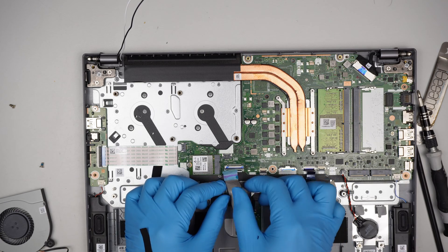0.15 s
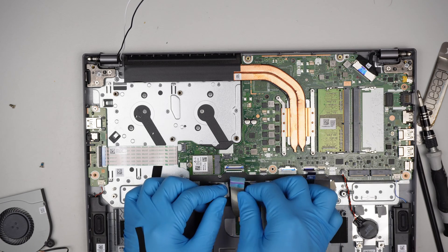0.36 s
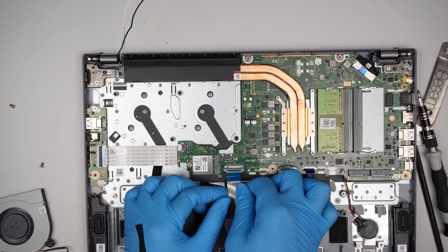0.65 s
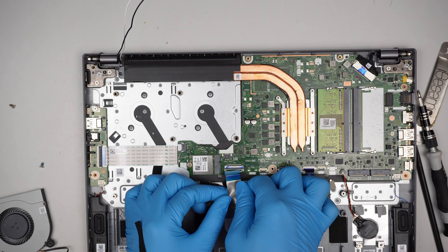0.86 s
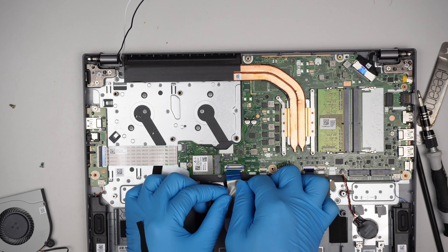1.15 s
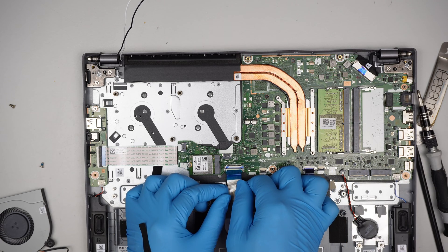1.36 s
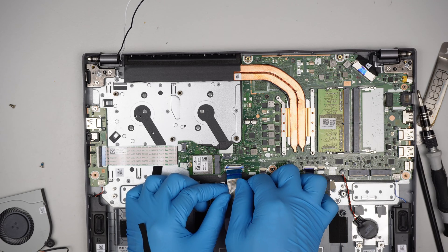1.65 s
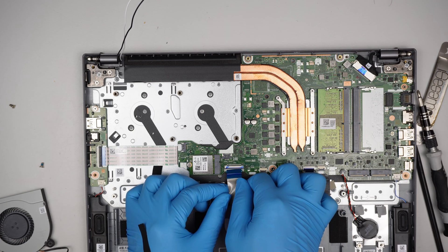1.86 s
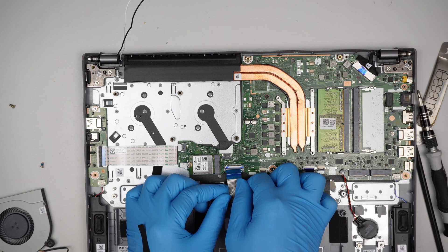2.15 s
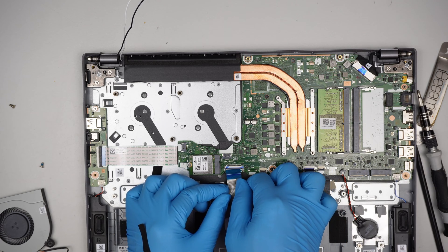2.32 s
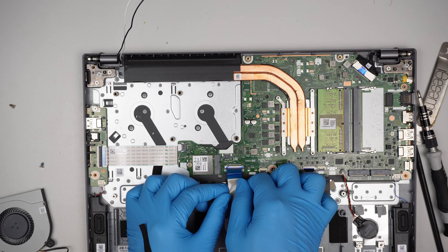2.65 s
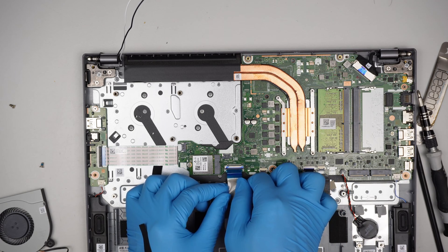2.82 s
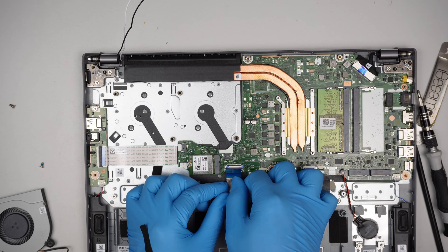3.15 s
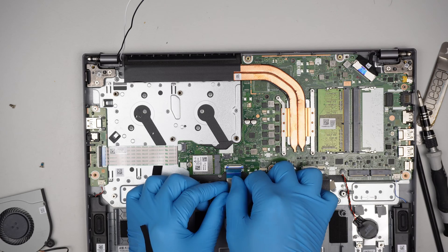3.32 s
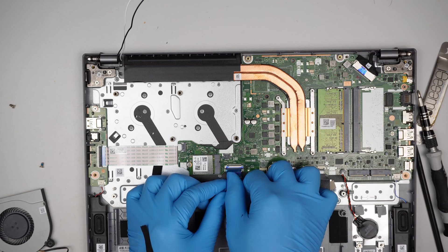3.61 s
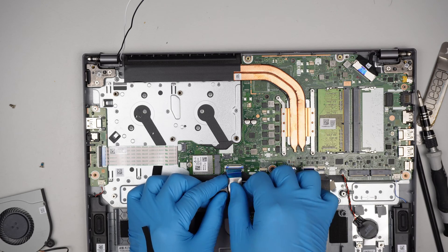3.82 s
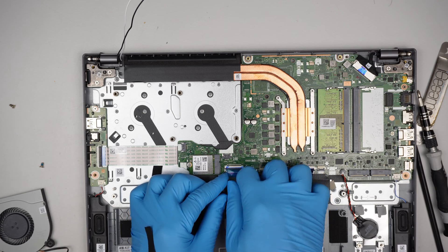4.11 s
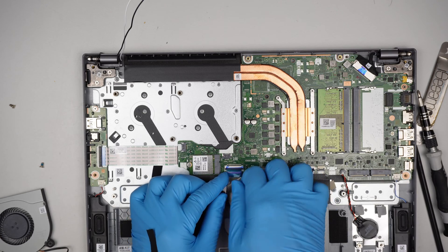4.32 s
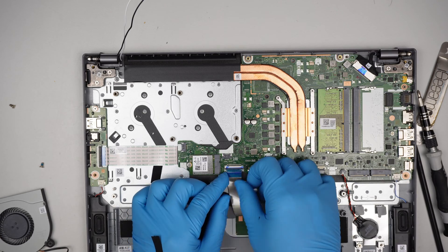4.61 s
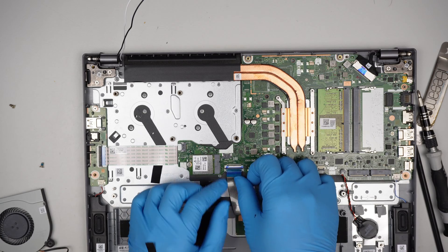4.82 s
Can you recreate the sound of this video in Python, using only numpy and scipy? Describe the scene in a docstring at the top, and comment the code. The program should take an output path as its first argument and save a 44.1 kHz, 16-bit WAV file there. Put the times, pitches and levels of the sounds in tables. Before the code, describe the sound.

Gloved fingers work a flat ribbon cable into a connector inside an open laptop. A few small plastic clicks and a brief rubbery squeak come first, then faint rubbing and one sharp click midway. Toward the end, scrapes, rustling and clicks crowd together, with a very thin whistle. The leaning hands make the bench rumble and bump softly. It is all heard close up in a small dry room.

```python
"""Small plastic clicks, scrapes and a rubbery squeak, close up in a small dry room, over a low rumble.
Gloved fingers are working a flat ribbon cable into its connector inside an open laptop.
Plastic parts click and ring the chassis; cable and glove rustle, scrape in stick-slip strokes,
squeak and whistle. The leaning hands scuff the hollow case and make the bench rumble and drone."""
import sys
import numpy as np
from scipy import signal
from scipy.fft import rfft, irfft
from scipy.io import wavfile

SR = 44100
rng = np.random.default_rng(int(sys.argv[2]) if len(sys.argv) > 2 else 0)


def bounce(signal):
    """Save signal as a 16-bit WAV file at the path given by the first command-line argument."""
    frames = np.transpose(np.atleast_2d(signal))
    limited = np.clip(frames, -1, 1)
    pcm = np.round(limited * 32767).astype(np.int16)
    wavfile.write(sys.argv[1], SR, pcm)


N = 219221
T = np.arange(N) / SR

# room tone: freq_hz, level_db
AIR_SPECTRUM = [(30, 1), (120, -4.5), (300, -19), (1000, -17), (4000, -35.5), (8000, -41), (16000, -41)]
# colour of the reflections: freq_hz, gain_db
REFLECTION_EQ = [(150, -13), (500, 2.5), (1500, 8), (1950, 3.5), (2200, -9.5), (2750, -3), (3400, -1),
                 (4050, -3.5), (5000, -2), (9000, 6.5), (15000, 8)]
# the hands lean on the bench: start_s, end_s, level_db
HAND_PRESSES = [(.26, .32, -52), (.46, .55, -51), (.69, .74, -54), (.79, .87, -53.5), (1.17, 1.22, -54),
                (1.37, 1.44, -48), (1.51, 1.66, -57.5), (1.69, 1.77, -52), (1.9, 1.96, -51.5),
                (2.05, 2.1, -53), (2.12, 2.29, -43), (2.43, 2.5, -46.5), (2.65, 2.69, -54),
                (2.82, 2.89, -45), (2.95, 3.07, -48.5), (3.13, 3.25, -52.5), (3.34, 3.44, -51.5),
                (3.55, 3.68, -54.5), (3.75, 3.9, -47.5), (3.91, 4.72, -44), (4.74, 4.97, -45.5)]
# low end of the bench: freq_hz, level_db
RUMBLE_SPECTRUM = [(20, -16), (35, -8), (55, -0.5), (90, 4.5), (120, 2), (160, -13), (240, -34.5),
                   (380, -39.5), (1000, -41), (2500, -68.5)]
# soft bumps of the hands on the laptop: time_s, level_db
HAND_BUMPS = [(.503, -38), (.543, -43.5), (1.403, -42), (2.684, -37.5), (2.842, -39), (2.877, -36),
              (2.977, -39), (3.039, -30.5), (3.233, -39.5), (4.259, -36), (4.522, -36.5)]
# rubbing heard through the hollow case: freq_hz, level_db
CASE_SPECTRUM = [(100, -23.5), (180, 3.5), (240, -1), (310, -7), (400, -3), (500, -19), (700, -18.5),
                 (1500, -44.5), (4000, -56)]
# palm scuffs, each drawing one dull note from the case: peak_s, level_db, pitch_hz
PALM_SCUFFS = [(0.099, -67, 207), (0.248, -61, 230), (.39, -66, 330), (.56, -70.5, 298),
               (0.621, -61.5, 249), (0.691, -66.5, 270), (.94, -76.5, 460), (1.21, -78.5, 638),
               (1.268, -64.5, 357), (1.41, -74, 632), (1.64, -71.5, 500), (2.125, -67, 482),
               (2.23, -76, 200.6), (2.57, -70.5, 324), (2.77, -72, 360), (3.1, -67.5, 892), (3.4, -75, 330),
               (3.504, -63, 250), (3.6, -65.5, 332), (3.691, -67, 324), (3.851, -64, 334),
               (4.311, -63, 300), (4.431, -65, 296), (4.54, -53, 249), (4.78, -60, 264), (4.871, -56, 330)]
# the gloves slide over the cable: start_s, end_s, level_db
GLOVE_SLIDES = [(0, .34, -57.5), (.36, .5, -79.5), (.68, .86, -78.5), (1.17, 1.23, -78), (1.66, 1.74, -76),
                (1.88, 2.02, -82), (2.2, 2.48, -74.5), (2.5, 2.8, -83.5), (2.82, 3.12, -69.5),
                (3.13, 3.52, -74.5), (3.5, 3.75, -72.5), (3.8, 4.12, -56), (4.25, 4.35, -61),
                (4.35, 4.5, -53), (4.55, 4.72, -61.5), (4.74, 4.97, -52)]
# colour of the glove rustle: freq_hz, level_db
GLOVE_SPECTRUM = [(400, -14.5), (850, 0.5), (1200, -5.5), (1700, -0.5), (2350, 1), (2780, 5), (3300, -1),
                  (4000, 3.5), (4900, -0.5), (5700, -2.5), (7700, -9), (10000, -23), (15000, -37)]
# the glove squeaks: start_s, end_s, level_db
GLOVE_SQUEAK = [(.28, .335, -48)]
# partials of that squeak: pitch_ratio, level_db
GLOVE_PARTIALS = [(.92, 4), (2.03, 2.5), (3.08, -10.5), (3.92, -25.5)]
# thin whistle of the sliding cable: start_s, end_s, level_db
CABLE_WHISTLE = [(4.47, 4.89, -62.5)]
# the whistle's single partial: pitch_ratio, level_db
WHISTLE_PARTIALS = [(1, 0)]
# the whistle glides with the speed of the slide: time_s, pitch_hz
WHISTLE_GLIDE = [(4.52, 9550), (4.64, 9880), (4.71, 10500), (4.8, 10500), (4.9, 9600)]
# ring of board and chassis: pitch_hz, level_db, t60_s
CHASSIS_MODES = [(962, -8.5, 0.069), (1223, -11, 0.061), (1600, -17, .04), (2038, -5.5, 0.052),
                 (2188, -1, 0.027), (2718, -7.5, 0.069), (2983, -5, 0.037), (3076, -8, 0.0041),
                 (3913, -2.5, 0.031), (4787, -7.5, 0.038), (5520, -10, 0.015), (5720, -18.5, 0.075),
                 (6935, -22, 0.024), (7680, -11.5, 0.048), (8490, 1, 0.011), (10430, -12.5, 0.06),
                 (13180, -26, .02)]
# lower edges of the four registers of a contact: knock_hz, body_hz, snap_hz, tick_hz
REGISTER_EDGES = [700, 1500, 3200, 7000]
# scraping strokes: start_s, end_s, snap_db, body_vs_snap_db, tick_vs_snap_db, ring_hz, ring_db
SCRAPE_STROKES = [(0.015, 0.057, -58.5, -5, -5.5, 6500, 8.1), (0.09, 0.135, -54, -25, -5.5, 4090, 4.1),
                  (0.181, 0.226, -52.5, -6.5, -12, 1080, 18), (0.234, 0.299, -60, -10, -12, 3980, 6),
                  (0.795, 0.831, -65.5, -23, -3, 6760, 16), (2.054, 2.085, -47.5, -29, -33, 3950, 11),
                  (2.114, 2.105, -74, 1, -17, 2700, 1), (2.371, 2.394, -65, -4, -19, 4150, 14),
                  (2.822, 2.873, -92, 17.5, -15, 1680, 33), (2.873, 2.893, -83, 20, -12.5, 2750, 29),
                  (3.323, 3.374, -71.5, -18.5, -11.5, 5270, 18), (3.558, 3.608, -74, -14, -17, 2800, 14),
                  (3.681, 3.742, -59.5, -25, -21.5, 4160, 0.79),
                  (3.745, 3.788, -54.5, -10.5, -20.5, 4200, 10), (3.777, 3.852, -45, -3, -23, 4200, 7),
                  (3.848, 4.006, -52.5, 3, -24.5, 1916, 16), (3.987, 4.035, -49, 1.5, -28, 1890, 8.8),
                  (4.084, 4.131, -70.5, 12, -2, 4060, 8), (4.346, 4.378, -52.5, -32, -18, 3960, 4),
                  (4.372, 4.412, -48, -10.5, -15, 5260, 11), (4.396, 4.438, -45, -0.5, -4, 4960, 10),
                  (4.677, 4.717, -53.5, -21, -9.5, 5550, 5.8), (4.725, 4.773, -42, -8, -23, 3720, 1.1),
                  (4.79, 4.81, -38.5, -7.5, -18.5, 4770, 3), (4.805, 4.84, -44.5, -3, -13.5, 2800, 1),
                  (4.84, 4.986, -50, 0, -15.5, 2810, 5.8)]
# plastic clicks: start_s, knock_db, body_db, snap_db, tick_db, decay_s, ring_hz, ring_db
PLASTIC_CLICKS = [(0.005, -83, -50, -52, -61.5, 0.0016, 2220, 22),
                  (0.016, -58, -68, -47.5, -59, 0.0021, 6800, 8),
                  (0.088, -54.5, -44.5, -39.5, -50.5, 0.0017, 5800, 9),
                  (0.105, -62, -53, -44.5, -73, .0028, 3970, 14),
                  (0.171, -77, -66, -56.5, -67, 0.0022, 3650, 26),
                  (0.19, -48, -62, -79, -71, .0027, 1060, 31),
                  (0.26, -57, -49.5, -58, -72, 0.0018, 4010, 11),
                  (0.848, -69, -60, -45, -68.5, 0.0052, 3695, 12.5),
                  (1.647, -65.5, -71.5, -61, -103, 0.0032, 4230, 19),
                  (1.696, -84.5, -91, -54.5, -108, 0.0037, 4210, 25),
                  (2.1134, -47.5, -27.5, -30.5, -45, .0028, 2253, 13.5),
                  (4.0141, -48.5, -49.5, -33, -46, .0015, 4240, 7),
                  (4.064, -50, -64, -63, -66, 0.0055, 1210, 21),
                  (4.0793, -57.5, -62, -42.5, -58.5, 0.0022, 5140, 7.5),
                  (4.299, -86, -47, -42.5, -61.5, .0028, 4060, 25.5),
                  (4.551, -89, -56.5, -44, -69, 0.0057, 2660, 18),
                  (4.574, -93, -61, -50.5, -72, .0023, 4760, -2),
                  (4.664, -97, -56, -51.5, -63, .0042, 2690, 16),
                  (4.7188, -58.5, -40, -33.5, -33.5, 0.0023, 4750, 23),
                  (4.7219, -54.5, -33.5, -34, -43, 0.0022, 3630, 11),
                  (4.77, -89, -38, -39.5, -50, .006, 3160, 8),
                  (4.912, -53.5, -51, -40, -50.5, .0024, 6100, 6)]

TOP_HZ = 16100


def undb(db):
    """Decibels to gain."""
    return 10 ** (np.asarray(db) / 20)


def unit(x):
    """Scale to rms 1."""
    return x / np.sqrt(np.mean(x ** 2) + 1e-30)


def walk(rate_hz, size=N):
    """Smooth random drift that turns about rate_hz times a second."""
    return np.interp(np.arange(size) * rate_hz / SR, np.arange(4096), rng.standard_normal(4096))


def colour(x, points):
    """EQ x with a curve of (freq_hz, gain_db) points."""
    hz, db = np.transpose(points)
    freqs = np.fft.rfftfreq(x.shape[-1], 1 / SR)
    return irfft(rfft(x) * undb(np.interp(np.log(freqs + 1), np.log(hz), db)), x.shape[-1])


def filtered(x, order, hz, kind="low"):
    """Butterworth filter."""
    return signal.sosfilt(signal.butter(order, hz, kind, fs=SR, output="sos"), x)


def fade(t, t60_s):
    """A decay that falls 60 dB in t60_s."""
    return np.exp(-np.log(1000) * t / t60_s)


def stereo(pair, side_db):
    """Left and right from a mid and a side signal."""
    return pair[0] + undb(side_db) * pair[1] * np.array([[1], [-1]])


def add(out, x, start_s):
    """Mix x into out from start_s on."""
    i = max(int(start_s * SR), 0)
    out[:, i:i + x.shape[1]] += x[:, :max(N - i, 0)]


def gestures(table, attack_s, release_s):
    """Envelope of movements that build, hold and die away; overlapping ones add their power."""
    power = 0
    for start_s, end_s, db in table:
        rise = np.clip((T - start_s) / attack_s, 0, 1)
        fall = np.exp(-np.clip((T - end_s) / release_s, 0, 20))
        power = power + (undb(db) * rise * fall) ** 2
    return np.sqrt(power)


def room_tone(level_db=-80):
    """A faint, steady bed of still air."""
    return stereo(unit(colour(rng.standard_normal((2, N)), AIR_SPECTRUM)), side_db=-5.5) * undb(level_db)


def reflections(x, early_db=-16, early_t60_s=.056, late_db=-21, late_t60_s=.39, treble_t60_s=.22):
    """The bench top answers at once; the walls ring on faintly, the treble for less long."""
    t = np.arange(SR * 3 // 4) / SR
    early, late, treble = rng.standard_normal((3, 2, len(t)))
    slap = unit(early * fade(t, early_t60_s) * (t > .003))
    dull = filtered(late, 2, 4500) * fade(t, late_t60_s)
    bright = filtered(treble, 2, 4500, "high") * fade(t, treble_t60_s)
    tail = unit((dull + bright) * (t > .008))
    response = colour(undb(early_db) * slap + undb(late_db) * tail, REFLECTION_EQ)
    response = stereo(response, side_db=-4.5) / np.sqrt(len(t))
    return signal.fftconvolve(x, response, axes=1)[:, :N]


def hand_weight(rest_db=-68.5, settle_s=.28, tremor_db=.66):
    """How hard the hands bear on the laptop: resting weight plus presses, a little unsteady."""
    resting = undb(rest_db) * np.clip(T / settle_s, 0, 1)
    pressing = gestures(HAND_PRESSES, attack_s=.023, release_s=.057)
    return np.hypot(resting, pressing) * undb(tremor_db * walk(10))


def bench(lean, drone_hz=60.36, drone_db=-1, rumble_db=-6, bump_hz=75, bump_s=.0069):
    """A low drone and a rumble swell as the hands lean in; bumps die in a cycle or two."""
    drone = np.sqrt(2) * np.sin(2 * np.pi * np.cumsum(drone_hz + .57 * walk(2.8)) / SR)
    rumble = stereo(unit(colour(rng.standard_normal((2, N)), RUMBLE_SPECTRUM)), side_db=-37)
    out = (drone * undb(drone_db) + rumble * undb(rumble_db)) * lean
    t = np.arange(4096) / SR
    bump = -np.sin(2 * np.pi * bump_hz * t) * (t / bump_s * np.exp(1 - t / bump_s)) ** 2
    for time_s, db in HAND_BUMPS:
        add(out, undb(db) * bump[None], time_s - bump_s / 2)
    return out


def palms(lean, drag_db=-74, scuff_q=2.5, scuff_fade_s=.011):
    """Soft rubbing in the hollow case: it grows with the hands' weight, and scuffs when they shift."""
    rub = rng.standard_normal((2, N)) * undb(3 * walk(45))
    out = unit(colour(rub, CASE_SPECTRUM)) * undb(drag_db) * unit(lean) ** (2 / 3)
    t = np.arange(-SR // 10, SR // 10) / SR
    swell = np.exp(-np.abs(t) / scuff_fade_s)
    for peak_s, db, pitch_hz in PALM_SCUFFS:
        note = signal.iirpeak(pitch_hz, scuff_q, fs=SR)
        scuff = signal.lfilter(*note, signal.lfilter(*note, rng.standard_normal((2, len(t)))))
        add(out, unit(scuff) * undb(db) * swell, peak_s + t[0])
    return stereo(out, side_db=-8.5)


def glove_rustle(shift_db=4, dull_hz=4500, creep_db=-92.5, full_treble_db=-59.5, gain_db=-2):
    """Fine grains of rubber creeping over the cable; the colour shifts as the contact point moves."""
    grains = colour(rng.standard_normal((2, N)) * undb(1.2 * walk(700) + 2.2 * walk(40)), GLOVE_SPECTRUM)
    edges_hz = np.geomspace(500, 14000, 19)
    bands = (filtered(grains, 2, [lo, hi], "band") for lo, hi in zip(edges_hz, edges_hz[1:]))
    shifting = unit(sum(band * undb(shift_db * walk(22)) for band in bands))
    slides = gestures(GLOVE_SLIDES, attack_s=.036, release_s=.077)
    effort = np.hypot(slides, undb(creep_db))  # the gloves are never quite still
    dull = signal.sosfiltfilt(signal.butter(2, dull_hz, fs=SR, output="sos"), shifting)
    brightness = np.minimum(effort / undb(full_treble_db), 1) ** .69  # light slides are duller
    return stereo(dull + (shifting - dull) * brightness, side_db=-4.5) * effort * undb(gain_db)


def friction_tone(pitch_hz, partials, waver, flutter_db, rough):
    """Slips so fast that they merge into an unsteady tone; rough smears each partial."""
    tone = 0
    for ratio, db in partials:
        carrier = np.exp(2j * np.pi * np.cumsum(ratio * pitch_hz * (1 + waver * walk(800))) / SR)
        smear = 1 + rough * (walk(600) + 1j * walk(600))
        tone = tone + undb(db + flutter_db * walk(170)) * (carrier * smear).imag / np.hypot(1, rough)
    return tone


def glove_squeak(pitch_hz=2178):
    """The rubber glove gives one hoarse squeak on the plastic."""
    tone = friction_tone(pitch_hz, GLOVE_PARTIALS, waver=.036, flutter_db=1, rough=.66)
    return tone * gestures(GLOVE_SQUEAK, attack_s=.0082, release_s=.013)


def cable_whistle():
    """The sliding cable whistles thinly, gliding up and back down."""
    pitch_hz = np.interp(T, *np.transpose(WHISTLE_GLIDE))
    tone = friction_tone(pitch_hz, WHISTLE_PARTIALS, waver=.0033, flutter_db=2.5, rough=.12)
    return tone * gestures(CABLE_WHISTLE, attack_s=.0083, release_s=.017)


def plastic(decay_s, ring_db):
    """One contact, as mid and side: a crack of dense, short modes and the longer chassis ring."""
    t = np.arange(4096) / SR
    crack = rng.standard_normal((2, len(t))) * np.exp(-t / decay_s)
    ring = sum(undb(db) * np.sin(2 * np.pi * (hz * t + rng.random((2, 1)))) * fade(t, t60_s)
               for hz, db, t60_s in CHASSIS_MODES)
    return unit(crack) + undb(ring_db) * unit(ring)


def voiced(pair, levels_db, ring_hz, ring_db, length_s, top_hz, side_db, soft_hz=7500, soft_db=-66):
    """The touched part adds its own ring; each register is levelled over the first length_s."""
    pair = pair + (undb(ring_db) - 1) * signal.lfilter(*signal.iirpeak(ring_hz, Q=12, fs=SR), pair)
    # harder contacts tick louder and reach higher: an octave for every 22 dB
    reach_hz = np.clip(soft_hz * 2 ** ((levels_db[3] - soft_db) / 22), SR / 10, TOP_HZ)
    pair = filtered(pair, 4, reach_hz)
    widths_db = (-4, -9.5, -.5, 8)  # the tick spreads widest
    out = 0
    for lo, hi, db, width_db in zip(REGISTER_EDGES, REGISTER_EDGES[1:] + [top_hz], levels_db, widths_db):
        band = filtered(pair, 4, [lo, hi], "band")
        rms = np.sqrt(np.mean(band[:, :int(length_s * SR)] ** 2, axis=1, keepdims=True) + 1e-30)
        out = out + undb(db) * stereo(band / rms, side_db + width_db)
    return out


def slip_train(length_s, stroke_s=.05, slips_per_s=470, uneven=.33, scatter_db=2, edge_s=.0067):
    """The stick-slip impulses of one stroke; strokes longer than stroke_s slip slower and steadier."""
    haste = (stroke_s / length_s) ** .5
    size = int(length_s * SR)
    t = np.arange(size) / SR
    timing, strength = rng.standard_normal((256, 2)).T
    times = np.cumsum(np.exp(uneven * haste * timing)) / (slips_per_s * haste)
    times = times - times[0] * .82  # the first slip comes almost at once
    inside = times < length_s
    slips = np.zeros(size + 1)
    slips[(times[inside] * SR).astype(int)] = undb(scatter_db * strength[inside])
    # the pressure builds, wavers and lets off
    pressure = np.clip(np.minimum(t, length_s - t) / min(edge_s, length_s / 4), .3, 1)
    return slips[:size] * pressure * undb(.24 * walk(54, size))


def scrapes(grit_db=-4, grit_decay_s=.0022, knock_vs_body_db=-12, top_hz=12000):
    """Surfaces stick and slip: each slip knocks the plastic and sheds a short burst of grit."""
    out = np.zeros((2, N))
    for start_s, end_s, snap_db, body_vs_snap_db, tick_vs_snap_db, ring_hz, ring_db in SCRAPE_STROKES:
        offsets_db = np.array([body_vs_snap_db + knock_vs_body_db, body_vs_snap_db, 0, tick_vs_snap_db])
        length_s = max(end_s - start_s, .005)
        slips = slip_train(length_s)
        bursts = signal.lfilter([1], [1, -np.exp(-1 / (grit_decay_s * SR))], slips)
        grit = bursts * rng.standard_normal((2, len(slips)))
        knocks = signal.fftconvolve(slips[None], plastic(decay_s=.00099, ring_db=-4.5), axes=1)
        rasp = signal.fftconvolve(grit, plastic(decay_s=.0016, ring_db=-12), axes=1)
        stroke = unit(knocks) + undb(grit_db) * unit(rasp)
        stroke = voiced(stroke, snap_db + offsets_db, ring_hz, ring_db, length_s, top_hz, side_db=-11)
        add(out, stroke, start_s)
    return out


def clicks(let_go_db=-4, max_lag_s=.0015, creep_db=-26, creep_rise_s=.012, top_hz=15000):
    """A plastic edge creeps for a moment, lets go and lands an instant later."""
    out = np.zeros((2, N))
    t = np.arange(SR // 50) / SR
    for start_s, *levels_db, decay_s, ring_hz, ring_db in PLASTIC_CLICKS:
        click = undb(let_go_db) * plastic(decay_s * .5, ring_db=-9)
        landing = plastic(decay_s * 1.1, ring_db=-7)
        lag = int(max_lag_s * SR * min(decay_s / .003, 1)) + 1
        click[:, lag:] += landing[:, :-lag]
        add(out, voiced(click, levels_db, ring_hz, ring_db, .01, top_hz, side_db=-14), start_s)
        # friction swells over the last 20 ms before the edge gives
        creep = rng.standard_normal((2, len(t))) * np.exp(t / creep_rise_s)
        creep = voiced(creep, levels_db, ring_hz, ring_db, t[-1], top_hz, side_db=-16)
        add(out, undb(creep_db) * creep, start_s - t[-1])
    return out


def scene(pan_db=-1.6):
    """The finger work sits slightly right, with its reflections, over case, bench and room tone."""
    fingers = clicks() + scrapes() + glove_rustle() + glove_squeak() + cable_whistle()
    fingers = fingers * undb(np.array([[pan_db], [-pan_db]]) / 2)
    lean = hand_weight()
    return room_tone() + reflections(fingers) + palms(lean) + bench(lean) + fingers


def record(dry):
    """A steep low-pass trims the very top."""
    return signal.sosfilt(signal.ellip(8, .2, 70, TOP_HZ, fs=SR, output="sos"), dry)


dry = scene()
out = record(dry)
bounce(out)
```